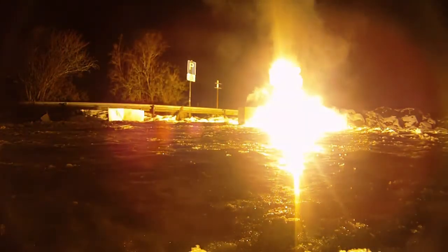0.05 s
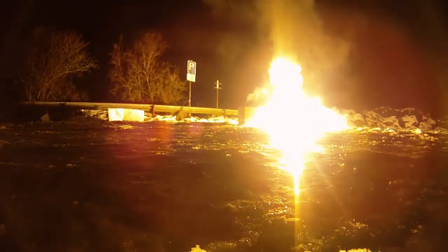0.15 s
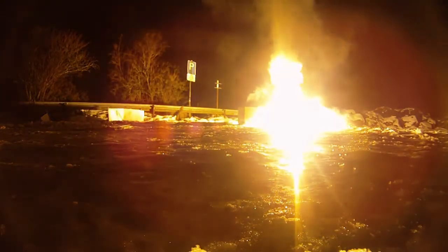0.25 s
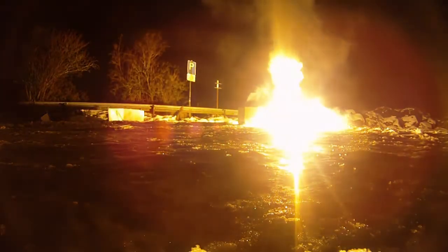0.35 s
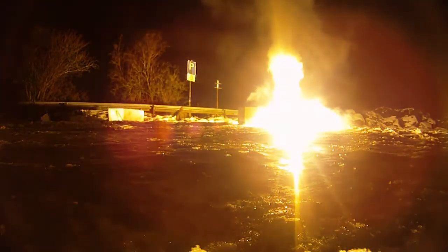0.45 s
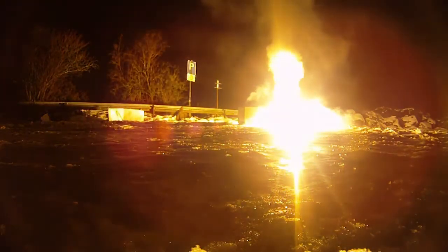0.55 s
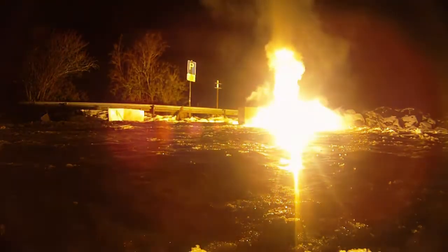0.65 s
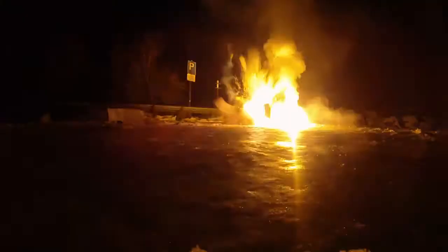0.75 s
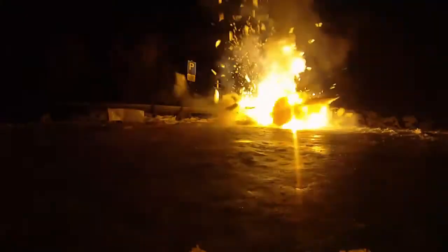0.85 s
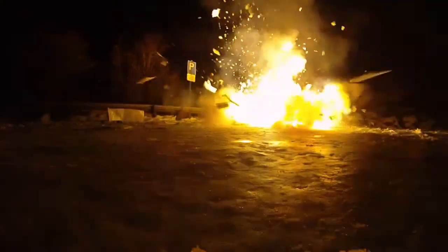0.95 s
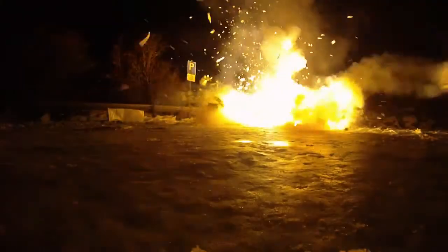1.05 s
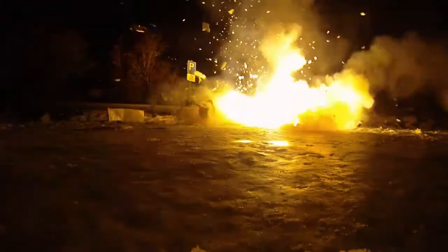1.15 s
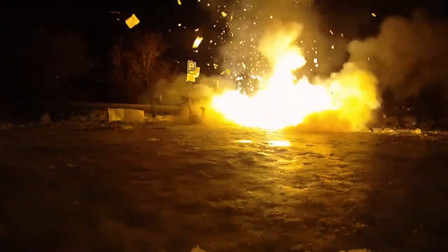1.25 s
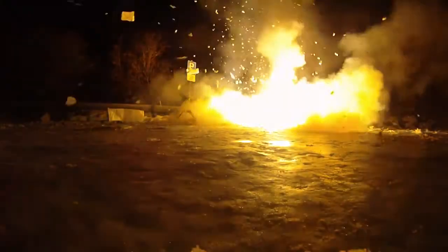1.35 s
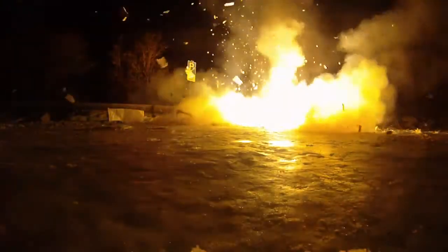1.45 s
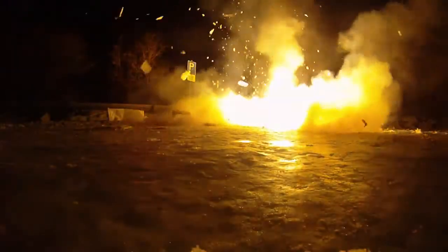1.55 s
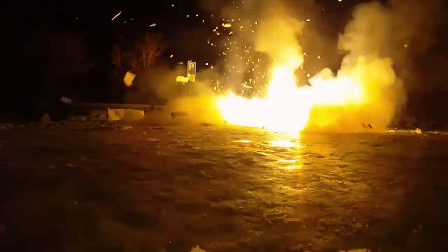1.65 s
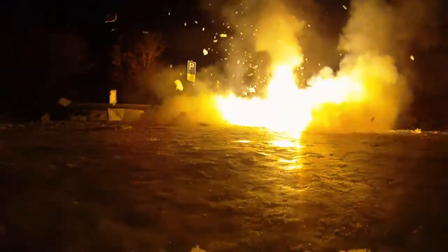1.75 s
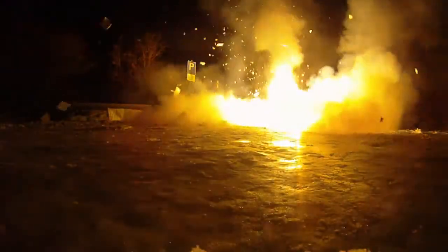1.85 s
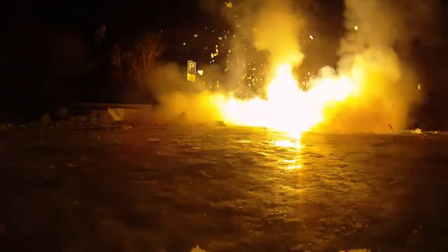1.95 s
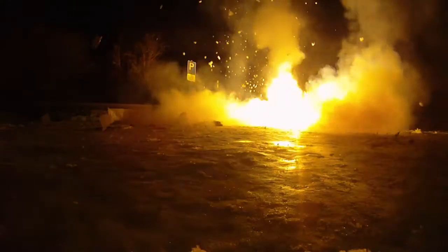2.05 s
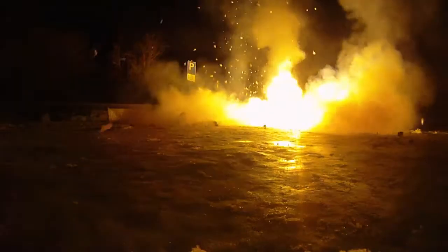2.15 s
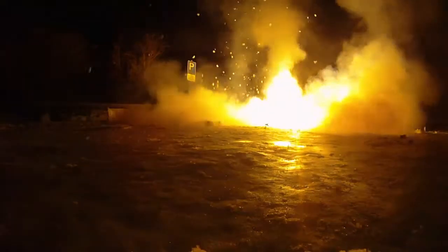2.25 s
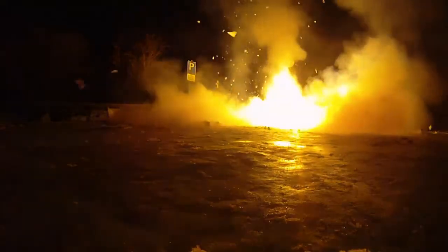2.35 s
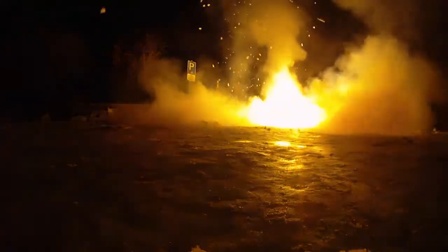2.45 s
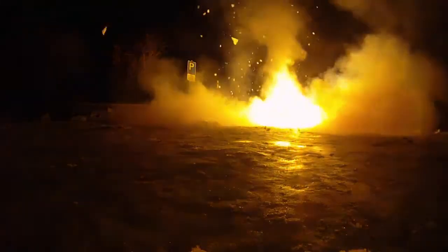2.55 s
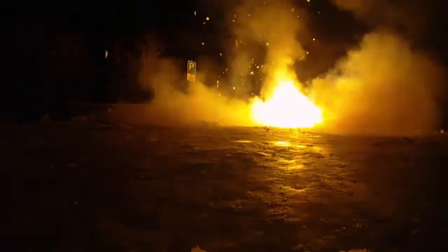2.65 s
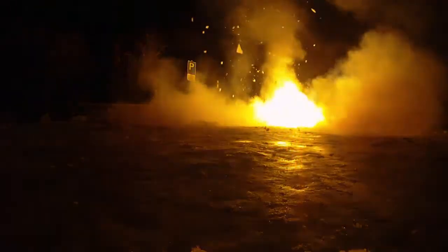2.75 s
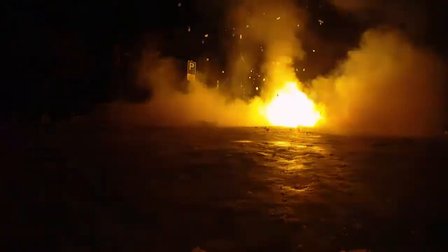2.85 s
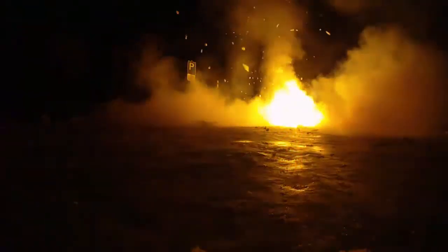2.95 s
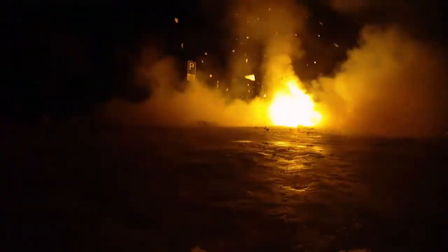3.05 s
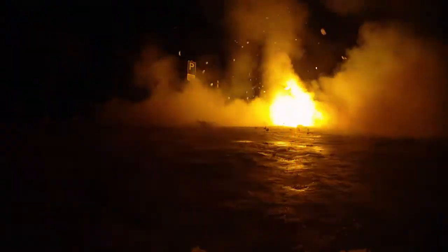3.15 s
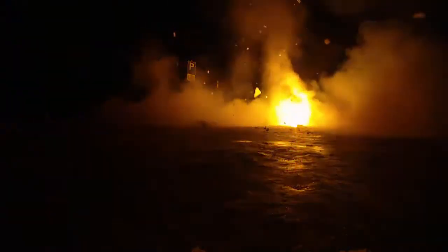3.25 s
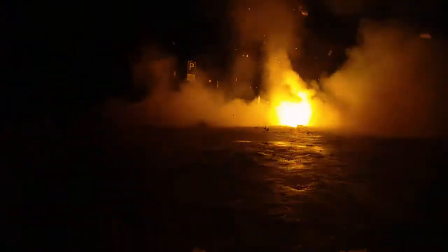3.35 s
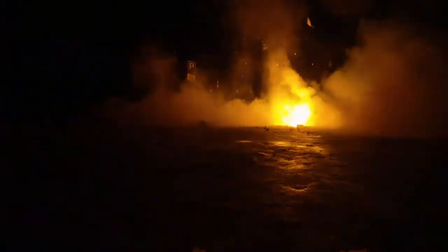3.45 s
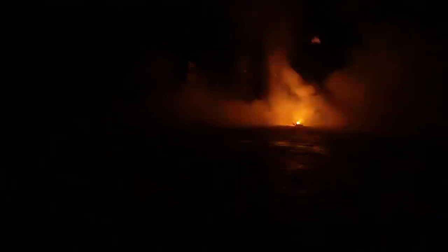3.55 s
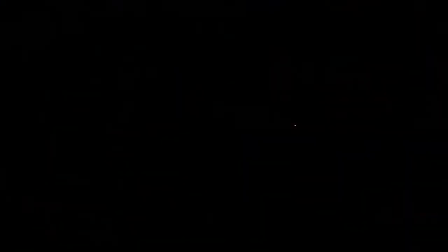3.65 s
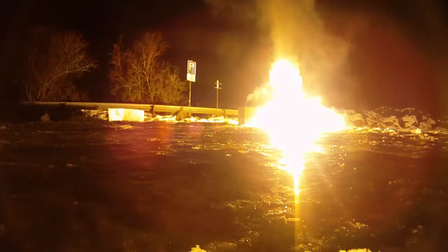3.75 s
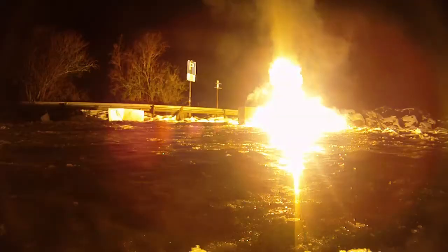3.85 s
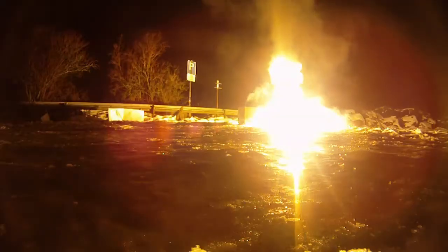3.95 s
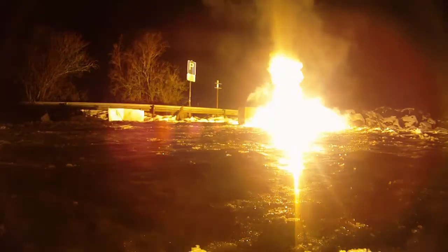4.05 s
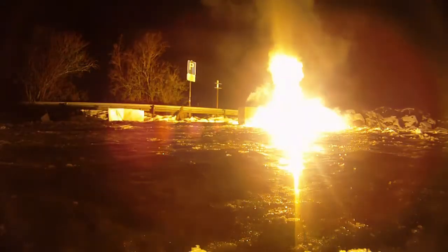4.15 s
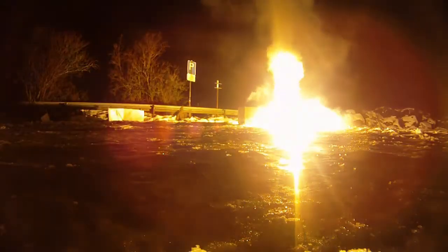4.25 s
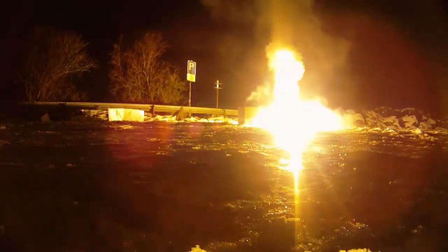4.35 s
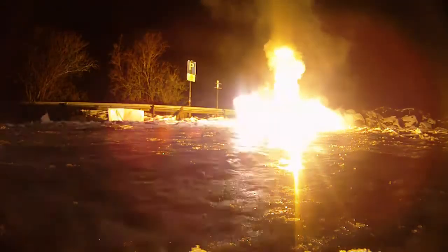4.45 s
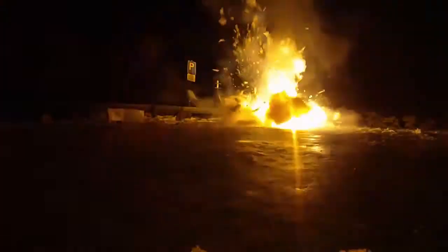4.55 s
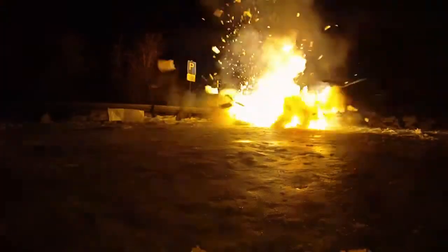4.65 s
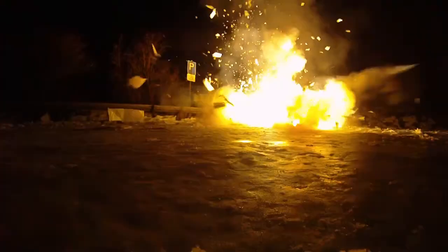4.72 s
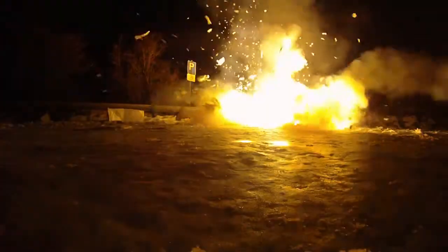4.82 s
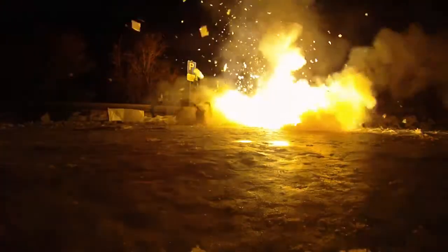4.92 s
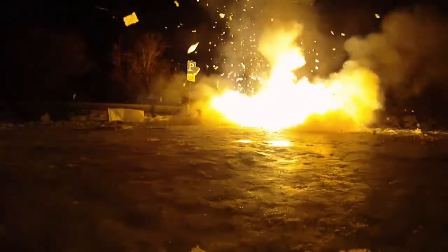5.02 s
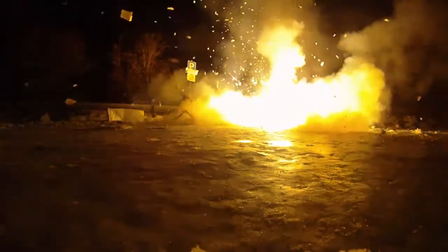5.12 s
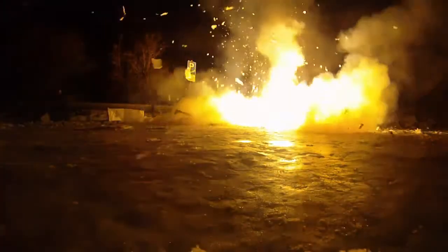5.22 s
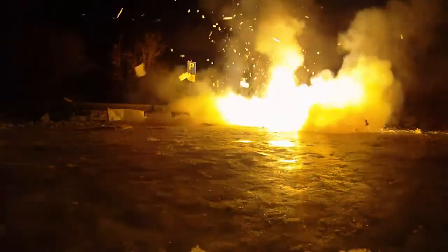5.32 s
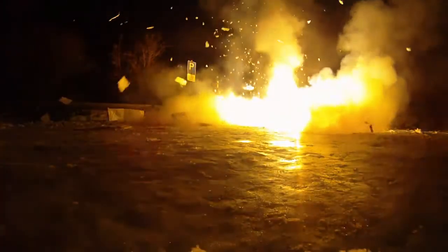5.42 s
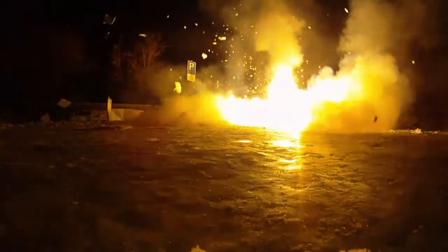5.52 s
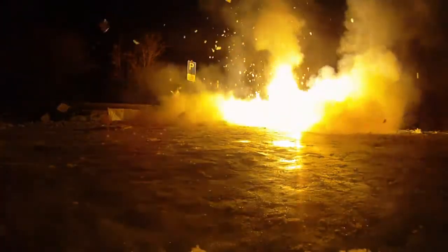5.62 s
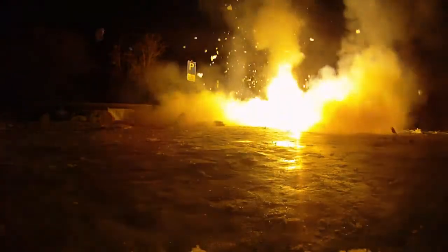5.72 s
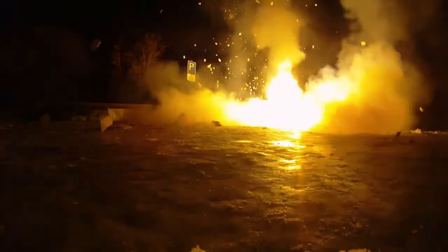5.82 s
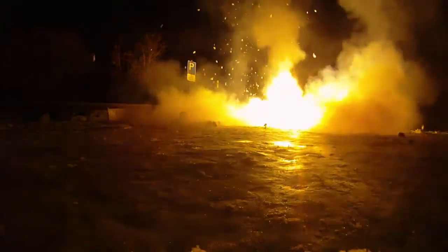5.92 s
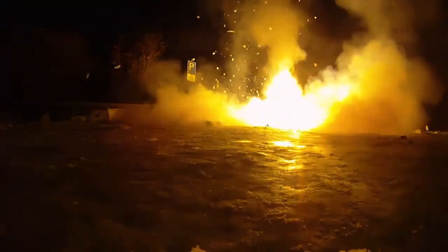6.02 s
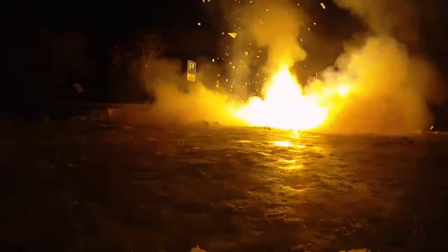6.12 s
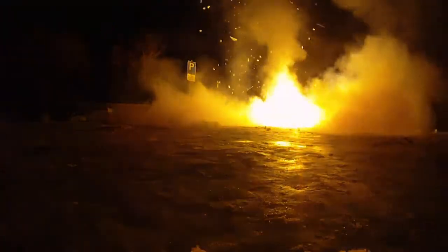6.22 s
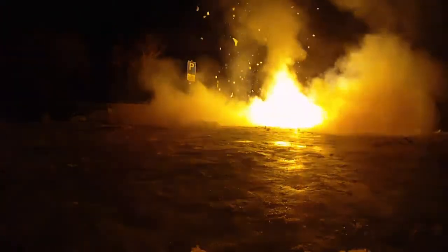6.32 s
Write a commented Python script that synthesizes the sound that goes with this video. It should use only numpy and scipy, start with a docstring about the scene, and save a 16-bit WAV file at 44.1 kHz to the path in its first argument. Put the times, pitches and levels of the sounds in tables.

```python
"""Firecracker in a metal appliance

On an icy lot in the still of night, a big firecracker blows a metal appliance apart.
Steep pressure fronts overload the microphone; filtered noise rumbles back from trees and banks.
Noise bursts and grains make the landing debris and skids, swaying sines a torn, tumbling panel.
The shot is cut off short and then starts a second time."""
import sys
import numpy as np
from scipy import signal
from scipy.io import wavfile
from scipy.ndimage import uniform_filter1d

SR = 44100
rng = np.random.default_rng(int(sys.argv[2]) if len(sys.argv) > 2 else 0)


def generate_wav(sig):
    """Save sig (samples, or channels by samples) to the path in sys.argv[1] as 16-bit PCM at SR."""
    pcm = np.round(np.clip(np.atleast_2d(sig).T, -1, 1) * 32767).astype(np.int16)
    wavfile.write(sys.argv[1], SR, pcm)


N = 281358
REPLAY_S, CUT_S = 3.735873, 3.703  # the second play starts; the debris stops within each play
TIME = np.arange(round(REPLAY_S * SR)) / SR

# pressure fronts, push and suction in turn, the last a thin late crack:
# (time [s], level [dB], rise [s], decay [s])
SHOCKS = [(0.8486, 2, 0.000036, 0.0031), (0.8514, 9.5, 0.0003, 0.003), (0.8544, 8, 0.0014, 0.002),
          (0.9424, 2, 0.0002, 0.000097)]
# spectrum of the dull body of pieces and scraps: (frequency [Hz], relative level [dB])
BODY = [(40, -5.5), (200, -1.5), (500, -4), (900, -2), (1300, -0.5), (2500, -11), (6000, -47)]
# spectrum of bright, crackling grit: (frequency [Hz], relative level [dB])
PATTER = [(200, -37.5), (900, -11.5), (1900, -1), (3200, 1.5), (5000, -4.5), (8000, -8.5), (11000, -18.5),
          (15000, -18)]


def gain_of(db):
    """Decibels to amplitude."""
    return 10 ** (np.asarray(db) / 20)


def evened(x):
    """Scales to unit rms."""
    return x / np.sqrt(np.mean(x ** 2) + 1e-20)


def crest_evened(x):
    """Scales the loudest 128 samples to unit rms."""
    return x / np.sqrt(uniform_filter1d(x ** 2, size=128).max())


def dying(t, t60):
    """Exponential decay by 60 dB in t60 seconds."""
    return np.exp(-np.log(1000) * t / t60)


def add(mix, s, sound):
    """Mixes a sound in at time s."""
    part = mix[round(s * SR):][:len(sound)]
    part += sound[:len(part)]


def noise(t):
    """White noise as long as t."""
    return rng.standard_normal(len(t))


def band_of(x, hz, width_hz):
    """Keeps one band of x, as a broad resonance does."""
    edges = [hz - width_hz / 2, hz + width_hz / 2]
    return signal.sosfilt(signal.butter(2, edges, "band", fs=SR, output="sos"), x)


def colour(x, spectrum, depth=1, size=4096):
    """Causal filter: a source's spectrum, heard through the microphone's resonances at the given depth."""
    # peaks and dips of the microphone's port and case: (centre [Hz], width [Hz], boost [dB])
    resonances = [(1250, 350, 2), (1490, 140, -5), (1750, 220, -6), (2210, 440, 12.5), (2850, 180, -3),
                  (3650, 750, 3.5), (6020, 600, -10), (8400, 900, 3), (9780, 450, 13), (12200, 1600, -8),
                  (14250, 500, 14), (15100, 400, 7)]
    hz = np.abs(np.fft.fftfreq(size, 1 / SR))
    table_hz, table_db = np.transpose(spectrum)
    db = np.interp(np.log(hz + 1), np.log(table_hz), table_db)
    for centre, width, boost in resonances:
        db = db + depth * boost * .5 ** ((2 * (hz - centre) / width) ** 2)
    # the Hilbert transform of the log gain gives the minimum phase
    response = np.fft.ifft(np.exp(signal.hilbert(np.log(gain_of(db))).conj())).real
    return signal.oaconvolve(x, response[:size // 2])[:len(x)]


def grains(t, per_s, spread_db, wash):
    """Tiny impacts of widely different size over a wash of countless smaller ones."""
    size = gain_of(spread_db * np.minimum(rng.exponential(1, len(t)), 4))
    struck = rng.random(len(t)) < per_s / SR
    clicks = size * rng.choice([-1, 1], len(t)) * struck
    return evened(evened(clicks) + wash * noise(t))


def swell(s, db, rise_s, hold_s, fall_db_per_s):
    """Gain that climbs 20 dB in rise_s to its crest at s, holds, then dies away."""
    climb_db = 20 * np.maximum(s - TIME, 0) / rise_s
    fall_db = fall_db_per_s * np.maximum(TIME - s - hold_s, 0)
    return gain_of(db - climb_db - fall_db)


def night(db=-59):
    """Faint steady air from all sides, which the microphone colours less."""
    # spectrum of the still air: (frequency [Hz], relative level [dB])
    air = [(20, 7), (90, 2.5), (250, -3.5), (500, -8), (1100, -10.5), (2200, -14), (3100, -14), (5000, -22),
           (8000, -23.5), (10000, -28), (15000, -32.5)]
    return gain_of(db) * evened(colour(noise(TIME), air, depth=0.55))


def blast():
    """Steep pressure fronts that relax in milliseconds; the diaphragm buzzes as it is flung across."""
    # the microphone's buzz under overload: (pitch [Hz], level [dB], half length [s])
    buzz = (5700, -3, .00022)
    out = np.zeros(len(TIME))
    for k, (s, db, rise, decay) in enumerate(SHOCKS):
        t = np.maximum(TIME - s, 0)
        out -= (-1) ** k * gain_of(db) * np.minimum(t / rise, 1) * np.exp(-t / decay)
    hz, db, length = buzz
    t = TIME - SHOCKS[1][0]
    return out + gain_of(db) * np.sin(2 * np.pi * hz * t) * np.exp(-(t / length) ** 2)


def rumble(echo_rise_s=0.12, echo_fall_db_per_s=76):
    """The blast scattered by trees and banks, deeper as it comes from farther away."""
    # spectra of the near and the far rumble: (frequency [Hz], relative level [dB])
    near_spectrum = [(25, -32.5), (60, 0.5), (110, 8), (170, 2.5), (280, -10), (450, -21), (1000, -43)]
    far_spectrum = [(25, -29), (50, 13.5), (100, -2), (200, -20), (450, -19), (1000, -86)]
    # rolls from the near trees, stopping quickly, and from beyond them, deeper:
    # (crest [s], level [dB], rise [s], hold [s], fall [dB/s])
    near_roll = (.975, -32.5, .07, .165, 260)
    deep_roll = (1.36, -43, 0.5, 0.14, 89)
    # faint, deep echoes from distant banks: (crest [s], level [dB])
    far_echoes = [(1.51, -50), (1.71, -54), (2.17, -53.5)]
    far = [swell(*deep_roll)]
    far += [swell(s, db, echo_rise_s, 0, echo_fall_db_per_s) for s, db in far_echoes]
    near_sound = swell(*near_roll) * evened(colour(noise(TIME), near_spectrum))
    far_sound = np.linalg.norm(far, axis=0) * evened(colour(noise(TIME), far_spectrum))
    return (near_sound + far_sound) * (TIME > SHOCKS[0][0])


def impact(low_db, high_db, t60, depth, contact=3, tail_db=-22, tail_t60=0.31):
    """A hard first contact, a quick crumble of smaller ones, and a faint scatter from the ground."""
    # spectra of the hard clack and the bright snap: (frequency [Hz], relative level [dB])
    clack = [(200, -28), (900, -3), (2000, 1.5), (3500, 6), (5000, -7), (8000, -4), (11000, -12.5),
             (15000, -15.5)]
    snap = [(800, -32), (2200, -26.5), (3200, -6.5), (5000, 0.5), (6200, 5), (7500, -2), (10000, -15),
            (12200, -5.5), (14300, -21.5), (16000, -8)]
    t = TIME[:SR // 5]
    out = np.zeros(len(t))
    fade = dying(t, t60) + gain_of(tail_db) * dying(t, tail_t60)
    # the snap dies twice as fast as the rest
    layers = ((clack, -6, fade), (BODY, -3 + low_db, fade), (snap, -4 + high_db, fade ** 2))
    for spectrum, level_db, shape in layers:
        sound = colour(noise(t) * shape + contact * (t == 0), spectrum, depth)
        out += gain_of(level_db) * crest_evened(sound)
    return out


def cracks(snap_db=-26.5, mic_depth=0.91):
    """Short, full cracks as the charge goes off and the casing bursts."""
    # (time [s], level [dB], low body relative to that level [dB], t60 [s])
    bursts = [(0.854, -16.5, -1, 0.015), (0.8714, -24, -4, 0.035), (0.9412, -6.5, -5, 0.013),
              (0.943, -15, -7.5, 0.016), (0.9489, -19.5, 2, 0.011)]
    out = np.zeros(len(TIME))
    for s, db, body_db, t60 in bursts:
        add(out, s, gain_of(db) * impact(body_db, snap_db, t60, mic_depth))
    return out


def tearing(db=-35, t60=0.34):
    """The casing rips: a crackle that dies away right behind the shock."""
    t, out = TIME[:SR // 3], np.zeros(len(TIME))
    grit = grains(t, per_s=1400, spread_db=2.0, wash=0.17)
    crackle = evened(colour(grit, PATTER, depth=.7))
    add(out, SHOCKS[2][0], gain_of(db) * crackle * dying(t, t60))
    return out


def thuds():
    """Low thuds from ground, near walls and big pieces, each a few dying cycles of a low sine."""
    # (time [s], level [dB], pitch [Hz], t60 [s])
    blows = [(0.8726, -17.5, 115, 0.0833), (0.943, -9.5, 168, 0.022), (1.101, -15, 129, 0.014),
             (1.152, -22.5, 110, 0.042), (1.632, -43, 228, 0.1038), (3.577, -35, 208, 0.032),
             (3.588, -40, 338, 0.11)]
    out, t = np.zeros(len(TIME)), TIME[:SR // 4]
    for s, db, hz, t60 in blows:
        add(out, s, -gain_of(db) * dying(t, t60) * np.sin(2 * np.pi * hz * t))
    return out


def shower_db():
    """Level of the falling debris over time, the powers of all waves summed."""
    # small debris flung straight out, lobbed, and thrown high:
    # (crest [s], level [dB], rise [s], hold [s], fall [dB/s])
    waves = [(1.008, -39, 0.15, 0.14, 69), (1.595, -49, 1, 0.55, 14.5), (3.084, -49.5, 0.54, 0.12, 20)]
    return 20 * np.log10(np.linalg.norm([swell(*wave) for wave in waves], axis=0) + 1e-12)


def shower(patter_db=-2, chatter_db=-3, clump_db=1.8, flutter_db=4):
    """Grit rains on the ice, bright and dull pieces in clumps of their own; a narrow chatter flutters on top."""
    # spectrum of the chatter: (frequency [Hz], relative level [dB])
    chatter = [(1200, -22.5), (2280, -1.5), (3300, -18.5), (7500, -20), (9800, -14.5), (12000, -41),
               (14300, -23), (16000, -19)]
    # the thicker the shower, the more dull pieces: -42 dB at -39 dB, and 1.435 dB gained per dB
    high_db = shower_db()
    low_db = -42 + 1.435 * (high_db + 39)
    layers = ((PATTER, high_db + patter_db, clump_db),
              (BODY, low_db, clump_db),
              (chatter, high_db + chatter_db, flutter_db))
    out = np.zeros(len(TIME))
    for spectrum, db, swing_db in layers:
        slow = uniform_filter1d(uniform_filter1d(noise(TIME), size=600), size=250)
        clumps = gain_of(swing_db * evened(slow))
        grit = grains(TIME, per_s=1900, spread_db=3, wash=.55)
        out += evened(colour(grit * clumps, spectrum)) * gain_of(db)
    return out * np.interp(TIME, [.94, .946], [0, 1]) * (TIME < CUT_S)


def splinters(db=-45, low_hz=2800, high_hz=9000, busiest_s=1.7, spread_s=0.5, count=320):
    """Small shards tick on the ice, each at its own pitch; they land thickest around busiest_s."""
    out, t = np.zeros(len(TIME)), TIME[:SR // 100]
    for when, pitch, size in rng.random((count, 3)):
        s = busiest_s + spread_s / 2 * np.log(when / (1 - when))  # logistic spread
        hz = low_hz * (high_hz / low_hz) ** pitch
        u = hz * t / 2  # a dry tick lasts only a few cycles
        tick = np.e * u * np.exp(-u) * np.sin(2 * np.pi * hz * t)
        if SHOCKS[-1][0] < s < CUT_S:
            add(out, s, gain_of(db + 12.6 * (size ** 2 - 1.0)) * tick)
    return out


def chips(db=8.0, spread_db=17, low_hz=900, high_hz=5000, t60=0.021, count=150):
    """Chips land at random within the shower, each with a short pop at a pitch of its own."""
    out, t, level_db = np.zeros(len(TIME)), TIME[:SR // 20], shower_db()
    for when, pitch, size in rng.random((count, 3)):
        s = SHOCKS[-1][0] + when * (CUT_S - SHOCKS[-1][0])
        hz = low_hz * (high_hz / low_hz) ** pitch
        pop = np.sin(2 * np.pi * hz * t) * dying(t, t60)
        add(out, s, gain_of(np.interp(s, TIME, level_db) + db - spread_db * size) * pop)
    return out * (TIME < CUT_S)


def clink(hz=2240, width_hz=210, t60=0.057):
    """A scrap of thin metal rattles to rest in one short, broad resonance."""
    t = TIME[:SR // 5]
    return crest_evened(band_of(noise(t) * dying(t, t60), hz, width_hz))


def landings(snap_db=-12.5, clink_db=-3, mic_depth=1.1):
    """Pieces hit the ice: light ones click, heavy ones crunch, and metal ones clink instead of snapping."""
    # (time [s], level [dB], heft from light shard to heavy chunk [0-1], ring from snap to clink [0-1])
    pieces = [(0.995, -30.5, 0.82, .4), (1.0977, -30, 0.97, .3), (1.1537, -22.5, 0.67, 0),
              (1.2456, -20, .1, 0.2), (1.2998, -30, 0.11, 0), (1.4503, -33.5, .3, 0.83),
              (1.5602, -29.5, 0.56, 0), (1.5724, -32, 0.61, 0), (1.6335, -33, 1, 0.053),
              (1.7976, -28, 0.25, 0.0055), (1.867, -32, 0.42, 0.27), (1.8879, -36, .5, 0),
              (1.9859, -32.5, 0.37, .6), (2.1668, -31.5, 0.74, 0), (2.2987, -33, .1, .9),
              (2.3155, -26, 0.036, 0.13), (2.3953, -42, 0.15, 0.59), (2.7101, -39.5, 0.25, 0.76),
              (2.7829, -35, 0.045, 0.059), (2.9276, -35, .3, 0.83), (3.193, -35.5, 0.85, 0.2),
              (3.3727, -41, 0.26, 1), (3.4477, -33.5, 0.12, 1), (3.5761, -31, .3, 0.67)]
    # a heavier piece has more body and crumbles for longer
    light_body_db, heavy_body_db, light_t60, heavy_t60 = -24.5, -4, 0.019, 0.073
    out = np.zeros(len(TIME))
    for s, db, heft, ring in pieces:
        body_db = light_body_db + heft * (heavy_body_db - light_body_db)
        t60 = light_t60 * (heavy_t60 / light_t60) ** heft
        hit = impact(body_db, snap_db - 20 * ring, t60, mic_depth)
        add(out, s, gain_of(db) * (hit + ring * gain_of(clink_db) * clink()))
    return out


def panel(spin_hz=15, flutter=0.53):
    """A ringing torn sheet of metal; it flexes and tumbles, which sways the pitch and the loudness."""
    # modes of the sheet: (pitch [Hz], relative level [dB], t60 [s])
    modes = [(1228, -6, .32), (3435, 0, .44), (8560, -6, .38), (10790, -25, .35), (13220, -27, .3)]
    # blows that ring it: (time [s], level [dB])
    blows = [(1.155, -44), (1.178, -36), (1.248, -39.5)]
    out, t = np.zeros(len(TIME)), TIME[:SR // 2]
    spin = np.sin(2 * np.pi * spin_hz * t)
    for s, blow_db in blows:
        flex = evened(uniform_filter1d(noise(t), size=700))
        clock = np.cumsum(1 + .003 * spin + .003 * flex) / SR  # time warped by the swaying pitch
        for hz, db, t60 in modes:
            ring = np.sin(2 * np.pi * (hz * clock + rng.random())) * dying(t, t60)
            add(out, s, gain_of(blow_db + db) * ring * (1 + flutter * spin))
    return out


def squeal():
    """The first skid's squeal: a short noisy hiss in a few broad bands."""
    # (start [s], length [s])
    span = (1.447, .085)
    # (centre [Hz], width [Hz], level [dB])
    bands = [(2560, 400, -34.5), (9450, 500, -49), (14700, 600, -49)]
    s, length = span
    out, t = np.zeros(len(TIME)), TIME[:round(length * SR)]
    for hz, width, db in bands:
        hiss = evened(band_of(noise(t), hz, width))
        add(out, s, gain_of(db) * hiss * signal.windows.tukey(len(t), .3))
    return out


def skids(squeal_hz=2287, squeal_width_hz=480, end_db=-10, crest=0.53, start_db=-3, lump_db=2.0):
    """A lumpy run of catches swells and fades, exciting the scrap's own broad resonance."""
    # scraps skidding on the ice: (start [s], length [s], level [dB])
    slides = [(1.449, 0.095, -36.5), (1.529, 0.19, -43.5), (1.829, 0.094, -45), (1.983, 0.059, -46.5),
              (2.839, 0.044, -49), (2.923, 0.045, -45), (3.346, 0.034, -49.5), (3.574, .14, -39)]
    # spectrum of the scraping catches: (frequency [Hz], relative level [dB])
    rasp = [(200, -34), (900, -1.5), (2000, 0.5), (3700, -1), (5200, -10), (7500, -11.5), (9600, -8.5),
            (11000, -25), (15000, -17)]
    out = np.zeros(len(TIME))
    for s, length, db in slides:
        # a heavier scrap slides for longer, with more body and less squeal
        doublings = np.log2(length / 0.048)
        body_db = db - 11 + 4.5 * doublings
        squeal_db = db - 2.5 - 12.5 * doublings
        t = TIME[:round(length * SR)]
        lumps = gain_of(lump_db * evened(uniform_filter1d(noise(t), size=160)))
        catches = grains(t, per_s=1900, spread_db=2, wash=0.4) * lumps
        sound = gain_of(db) * evened(colour(catches, rasp))
        sound += gain_of(body_db) * evened(colour(noise(t) * lumps, BODY))
        sound += gain_of(squeal_db) * evened(band_of(noise(t) * lumps, squeal_hz, squeal_width_hz))
        course_db = np.interp(t / length, [0, crest / 2, crest, 1], [start_db, 0, 0, end_db])
        add(out, s, sound * gain_of(course_db))
    return out * (TIME < CUT_S)


def scene():
    """One shot, then the same shot again, ending before it is through."""
    bang = blast() + rumble() + cracks() + tearing() + thuds()
    debris = shower() + splinters() + chips() + landings() + panel() + squeal() + skids()
    return np.tile(night() + bang + debris, 2)[None, :N]


def record(dry, low_cut_hz=22, edge_hz=15450):
    """The microphone sheds the deepest bass and clips at full scale; then the top treble is cut off."""
    heard = signal.sosfilt(signal.butter(1, low_cut_hz, "high", fs=SR, output="sos"), dry)
    low_pass = signal.firwin(255, edge_hz, window=("kaiser", 8), fs=SR)
    return signal.oaconvolve(np.clip(heard, -1, 1), low_pass[None], "same")


dry = scene()
out = record(dry)
generate_wav(out)
```